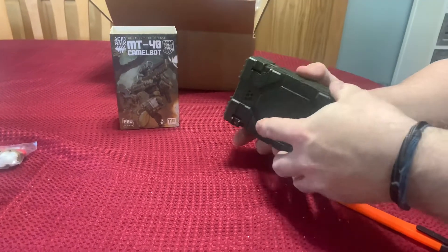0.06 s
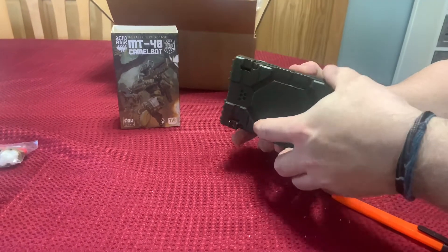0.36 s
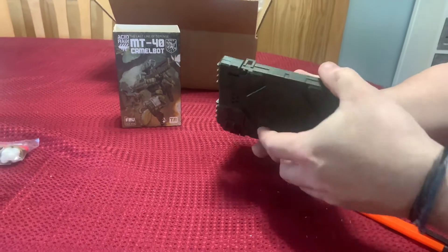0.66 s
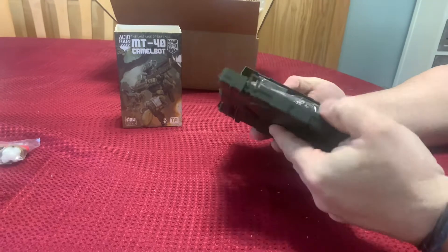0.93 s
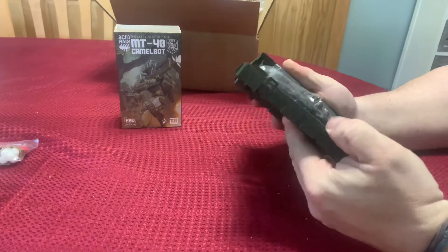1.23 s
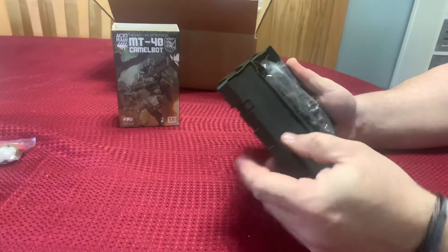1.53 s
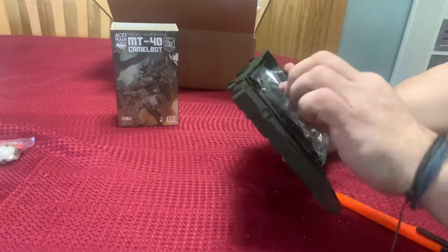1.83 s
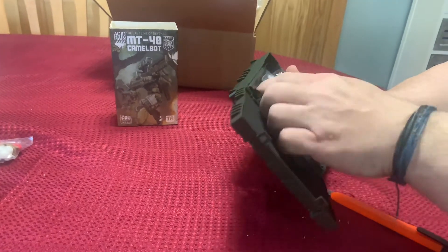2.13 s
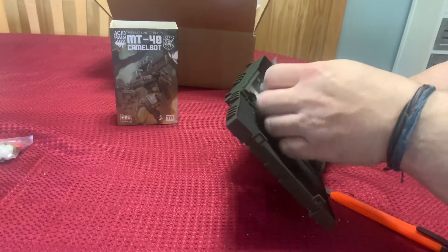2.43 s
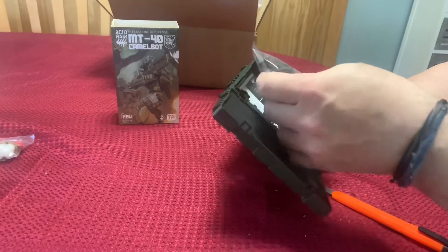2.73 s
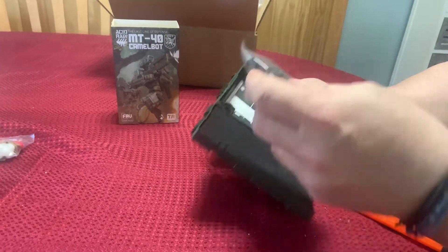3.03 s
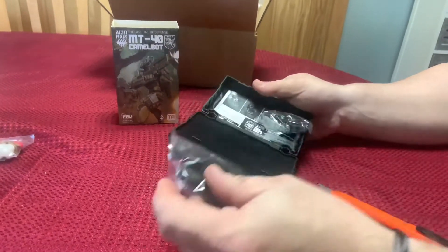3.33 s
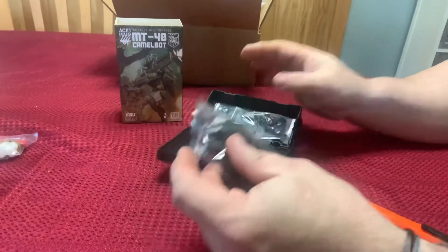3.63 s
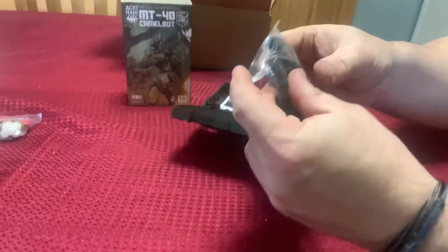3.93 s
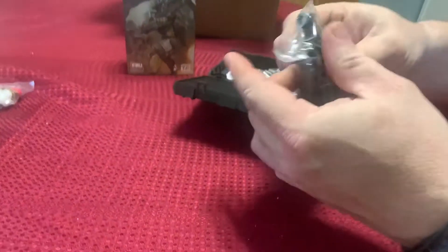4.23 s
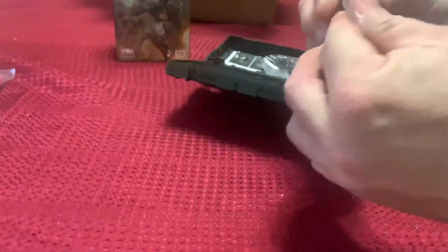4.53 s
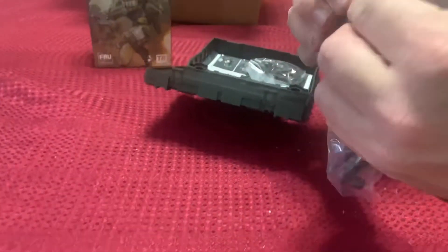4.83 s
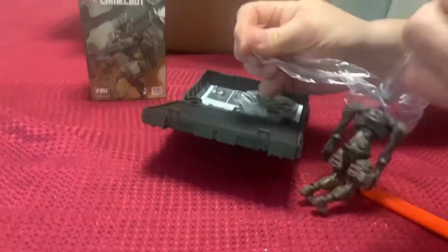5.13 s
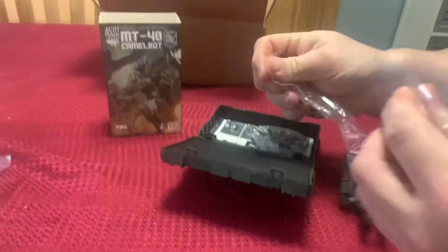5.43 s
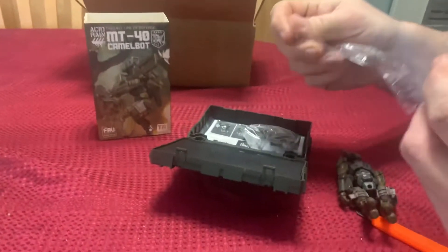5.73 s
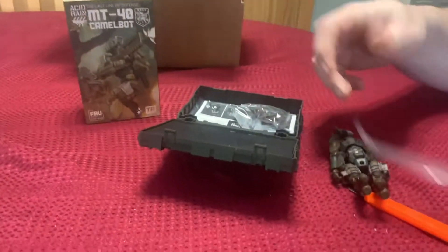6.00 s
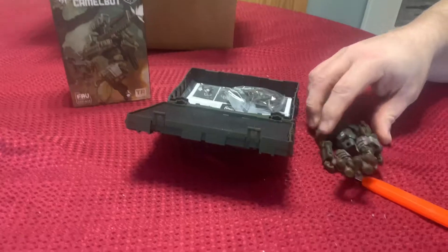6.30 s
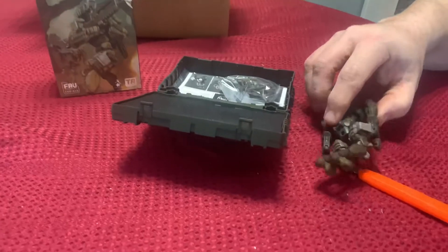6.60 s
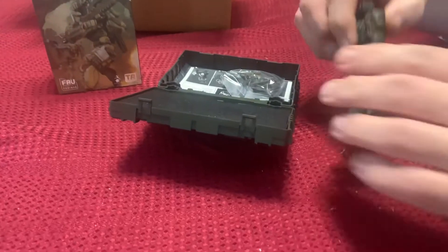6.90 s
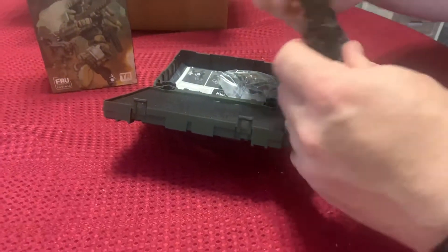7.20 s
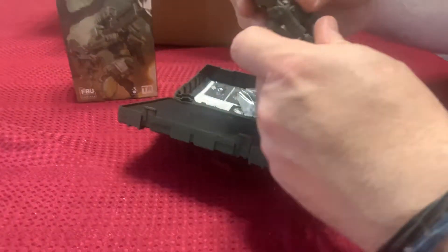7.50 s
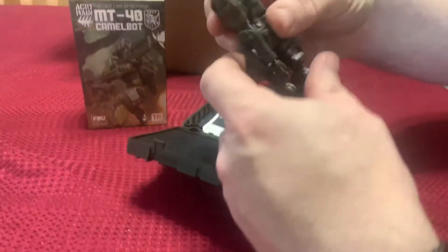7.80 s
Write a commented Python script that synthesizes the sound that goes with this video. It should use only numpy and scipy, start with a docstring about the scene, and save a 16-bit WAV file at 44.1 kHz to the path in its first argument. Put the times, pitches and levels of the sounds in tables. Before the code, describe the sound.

A small plastic click opens, followed by soft rubbing and shuffling as hands turn a hard case. A faint high whistle comes and goes around 1 to 2 seconds, with one brief creak. From about 2 seconds fingers tick and scrape inside the case, and a thin plastic bag begins to crackle. The hollow case knocks on a cloth-covered table at about 3.4 and 3.7 seconds. From 4 seconds the bag is squeezed and crinkles densely, loudest in a hard shake near 5 seconds. A small figure slides out at once, clacking and rattling, and lands with two dull pats by about 5.4 seconds. Scattered crackles and ticks thin out towards 6.7 seconds, leaving quiet rubbing and sliding over cloth until nearly 8 seconds. Everything is close, in a small room with a steady low rumble.

```python
"""A thin plastic bag crinkles as hands dig it out of a hard toy case, squeeze it and shake it.
Each crackle is a crease flipping over. The hollow case knocks on a cloth-covered table, and a small
figure slides out of the bag, clacks and lands with a pat. Fingers rub and tick on the plastic.
Two close microphones hear it all in a small room with a low rumble and, early on, a faint high whistle."""
import sys
import numpy as np
from scipy import signal
from scipy.fft import rfft, irfft, next_fast_len
from scipy.io import wavfile
from scipy.ndimage import uniform_filter1d

SR = 44100
rng = np.random.default_rng(int(sys.argv[2]) if len(sys.argv) > 2 else 0)


def master_out(mix):
    """Clip the mix to full scale and print it as 16-bit PCM to the path in sys.argv[1]."""
    frames = np.transpose(np.atleast_2d(mix))
    ceiling = np.clip(frames, -1, 1)
    pcm = np.round(ceiling * 32767).astype(np.int16)
    wavfile.write(sys.argv[1], SR, pcm)


N = 350586
HZ = np.fft.rfftfreq(2048, 1 / SR)  # the pitches at which filters are set

# tone of the case wall: pitch_hz, level_db
WALL_TONE = [(150, -2.5), (330, -1), (500, -4), (800, 2.5), (1150, 0), (1600, -1), (2550, 1), (3300, -2.5),
             (5000, -5.5), (9000, -8)]
# tone of the table's dull thud: pitch_hz, level_db
THUD_TONE = [(40, -36), (90, 7), (150, -1.5), (350, -3.5), (550, -30.5), (1200, -42.5)]


def bag():
    """Squeezing and shaking crinkle the bag, drag it over the parts inside and push puffs of air."""
    # fingers squeeze the bag: peak_s, level_db, rise_s, fall_s
    squeezes = [(2.4, -63.5, 0.4, .8), (3.1, -56, 0.15, 0.18), (3.97, -45.5, 0.25, 0.4),
                (4.09, -58, 0.06, 0.18), (4.29, -36.5, 0.21, 0.35), (4.445, -32, 0.2, 0.027),
                (4.517, -45.5, 0.066, 0.029), (4.645, -38, 0.068, 0.086), (4.87, -36.5, 0.56, 0.023),
                (5.14, -38, 0.073, 0.19), (5.42, -54, 0.23, .06), (5.67, -54, 0.16, 0.13),
                (6.04, -52.5, 0.29, 0.16)]
    # a jerk and a hard shake send the figure out: peak_s, level_db, rise_s, fall_s
    shakes = [(4.899, -28.5, 0.0044, .05), (4.95, -20, 0.0743, 0.12)]
    # the shaken bag flaps: peak_s, level_db, rise_s, fall_s
    flaps = [(4.96, -39.5, 0.076, 0.097)]
    # tones of the dragged sheet and the puff of air: pitch_hz, level_db
    sheet_tone = [(80, -26), (230, 0.5), (330, -1.5), (480, -3.5), (750, 3), (1100, -1), (1700, -3.5),
                  (2700, -1.5), (4000, 1.5), (5500, -7), (8000, -39)]
    puff_tone = [(30, -10), (70, 2), (130, 2.5), (230, -11.5), (400, 2), (550, -5.5), (1200, -19)]
    squeeze, shake = strokes(squeezes), strokes(shakes)
    # fine crackle grows faster with effort, so a light touch gives mostly single, larger creases
    fine = crinkle(squeeze ** 1.125, level_db=1.5, per_s=310, spread_db=5.5, ring_s=0.0034, focus_db=7.5)
    coarse = crinkle(squeeze ** 0.78, level_db=-19.5, per_s=31, spread_db=-0.5,
                     ring_s=0.006, focus_db=9.5)
    rush = crinkle(shake, level_db=1.0, per_s=660, spread_db=4.0)
    drag = friction((squeeze + shake) ** 1.12, sheet_tone, level_db=-9.5, grain_db=5.5, unlike=1.8)
    flap = friction(strokes(flaps), puff_tone, level_db=3.0, grain_db=2.5, unlike=0.35)
    return fine + coarse + rush + drag + flap


def crinkle(effort, level_db, per_s, spread_db, ring_s=0.0094, focus_db=8, count=24):
    """Tiny creases flip in flurries; more effort sets off more, and neighbours share a drifting pitch."""
    out = np.zeros((2, N))
    flurry, drift = [evened(uniform_filter1d(x, size=800)) for x in rng.standard_normal((2, N))]
    light_touch, flurry_db = amp(-55.5), 4
    rate = per_s * (effort / light_touch) ** 0.39 * amp(flurry_db * flurry)
    draw, scatter, chance = rng.random((3, N))
    pick = ((drift + scatter) / 2 % 1 * count).astype(int) % count
    creases = [evened(crease(hz, ring_s, focus_db)) for hz in np.geomspace(2500, 15000, count)]
    for i in np.flatnonzero(draw < rate / SR):
        size_db = spread_db * min(-np.log(chance[i]), 3.0)
        add(out, i / SR, creases[pick[i]] * amp(size_db))
    power = abs(uniform_filter1d((out ** 2).mean(0), size=3000))
    return amp(level_db) * effort * out / np.sqrt(power + .05)  # effort sets the loudness


def crease(pitch_hz, ring_s, focus_db):
    """A crease flips over and rings, along with a wide panel and a tiny facet of the film beside it."""
    # tone of the thin film: pitch_hz, level_db
    film_tone = [(100, -27), (600, -12), (1500, 1.5), (2800, 0.5), (4500, 0), (6500, 6), (8500, 10),
                 (11000, 7.5), (15500, 8.5)]
    panel_hz, facet_hz = rng.uniform([1200, 5500], [5000, 15500])
    peaks = focus_db * bump(pitch_hz, .07) + 7 * bump(panel_hz, .1) + 9 * bump(facet_hz, .04)
    return tint(burst(ring_s, unlike=1.0, size=900), read(film_tone, HZ) + peaks)


def snaps(level_db=5, gap_s=0.003, step_db=-11):
    """Creases snap in the bag and fingers make small ticks on plastic; two weaker clicks follow each."""
    # crease snaps and small finger ticks: start_s, level_db, pitch_hz
    snaps_and_ticks = [(.144, -38.5, 10500), (.479, -55, 11000), (.846, -58, 9100), (1.463, -53, 10500),
                       (1.8842, -36, 7160), (2.0291, -36, 6600), (2.074, -36.5, 6640), (2.162, -34, 6470),
                       (2.2205, -44, 4150), (2.284, -34.5, 4640), (2.363, -26, 10300), (2.4112, -30, 10600),
                       (2.419, -37, 10500), (2.4276, -26, 4100), (2.5085, -43, 4500), (2.5148, -34.5, 4500),
                       (2.539, -39, 10300), (2.61, -32, 6800), (2.636, -35.5, 10400), (2.685, -31, 9500),
                       (2.8485, -32, 9700), (2.886, -32.5, 10400), (2.955, -38.5, 6800),
                       (3.054, -36, 11200), (3.0764, -39, 10200), (3.126, -33.5, 11800),
                       (3.1502, -28, 10000), (3.365, -40, 6500), (3.426, -33.5, 6400),
                       (3.6687, -28.5, 10300), (3.691, -28, 7700), (3.774, -30, 9600), (3.8216, -30, 9600),
                       (3.8345, -27, 6900), (3.9168, -31, 10000), (3.9216, -21, 6500),
                       (3.9651, -20.5, 6860), (3.9845, -42, 7500), (4.008, -27, 10500),
                       (4.0368, -20, 10200), (4.042, -31, 3850), (4.0597, -39, 9800), (4.0716, -23, 10800),
                       (4.0865, -23, 10300), (4.093, -26, 7500), (4.1428, -27.5, 11800),
                       (4.1936, -32, 5940), (4.2328, -28, 11400), (4.2517, -20, 10800), (4.267, -33, 11500),
                       (4.2881, -21.5, 11700), (4.307, -29, 10600), (4.334, -23, 7680),
                       (4.3517, -30, 10100), (4.387, -24, 11100), (4.426, -22, 6490), (4.4417, -19, 10700),
                       (4.45, -21, 10600), (4.4767, -29, 9800), (4.502, -28, 11400), (4.5118, -19.5, 10500),
                       (4.522, -22.5, 10700), (4.546, -26.5, 10700), (4.586, -28.5, 10480),
                       (4.617, -27, 11140), (4.622, -29, 9500), (4.627, -20.5, 10400), (4.7002, -26, 11160),
                       (4.717, -25.5, 10480), (4.798, -28, 10100), (4.827, -22.5, 11500),
                       (4.8316, -23, 9700), (4.8707, -22.5, 10000), (4.881, -26, 7000),
                       (4.8971, -13.5, 10100), (4.923, -13.5, 14500), (4.9491, -7, 6900),
                       (4.976, -11.5, 7290), (5.0302, -13.5, 3970), (5.049, -25, 11000), (5.063, -27, 6040),
                       (5.223, -29.5, 6700), (5.36, -29, 6600), (5.4402, -29, 5530), (5.598, -38, 6200),
                       (5.6587, -36, 6600), (5.8459, -30.5, 3830), (5.9374, -43, 9440),
                       (5.9672, -36.5, 9800), (6, -42, 11000), (6.0524, -39, 6600), (6.0867, -37, 4350),
                       (6.111, -37, 4030), (6.158, -53, 10600), (6.188, -41.5, 3920), (6.591, -44, 12000),
                       (6.704, -48.5, 10500)]
    out = np.zeros((2, N))
    for start_s, snap_db, pitch_hz in snaps_and_ticks:
        for k in range(3):
            click = crease(pitch_hz * 2 ** (k * rng.uniform(-.3, .3)), ring_s=.005, focus_db=9)
            delay_s = k * gap_s * rng.uniform(.5, 1.1)
            add(out, start_s + delay_s, peaked(click, snap_db + level_db + k * step_db))
    return out


def case_knocks(level_db=-20, contact_s=0.00215):
    """Each knock rings the hollow case twice and thumps the table; where it lands sets the tone."""
    # knocks: start_s, level_db, pitch_hz, drop_db (per octave away from that pitch), crack_db, thud_db,
    # bounce_s, bounce_db, room_db
    knocks = [(.1437, -29, 790, 45, -42, -45.5, 0.00479, -0.5, -5),
              (2.967, -37.5, 620, 14, -52, -51, 0.019, -11.5, 1.5),
              (3.443, -16.5, 865, 9, -23, -38.5, .017, -8, 0.5),
              (3.678, -24, 1000, 11.5, -38, -44.5, 0.018, -13, -1.5)]
    # the notes the case rings at: pitch_hz, level_db, ring_s
    case_notes = [(139, -13, .1), (233, -6, 0.055), (353, -3.5, 0.079), (510, -4, 0.036), (671, -6, 0.042),
                  (744, 1, 0.025), (831, -1, 0.027), (915, 8, 0.013), (960, -2, 0.024), (1030, -18, 0.034),
                  (1110, -8, 0.031), (1178, -2, 0.039), (1380, 4, 0.02), (1630, -6, 0.024),
                  (1646, -4, 0.027)]
    # tone of the crack where it hits: pitch_hz, level_db
    crack_tone = [(200, -13), (900, 7), (1700, 8.5), (3300, 2.5), (3900, -19.5), (12000, -29)]
    out, t = np.zeros((2, N)), np.arange(SR // 8) / SR
    note_hz, note_db, ring_s = np.transpose(case_notes)[:, :, None]
    for start_s, knock_db, pitch_hz, drop_db, crack_db, thud_db, bounce_s, bounce_db, room_db in knocks:
        hit = np.zeros((2, SR // 2))
        weight_db = note_db - drop_db * abs(np.log2(note_hz / pitch_hz))
        for delay_s, blow_db in [(0, 0), (bounce_s, bounce_db)]:
            ring = ringing(t, note_hz, weight_db, ring_s, unlike=0.34)
            ring *= 1 - np.exp(-(t / contact_s) ** 4)  # the cloth cushions the blow
            add(hit, delay_s, amp(knock_db + level_db + blow_db) * evened(ring))
        crack = tint(burst(ring_s=0.01, unlike=0.57), read(crack_tone, HZ))
        thud = tint(burst(ring_s=0.35, unlike=0.1, size=5000), read(THUD_TONE, HZ))
        add(hit, contact_s, peaked(crack, crack_db))
        add(hit, contact_s, peaked(thud, thud_db))
        add(out, start_s, room(hit, near_db=room_db - 6, tail_db=room_db - 8))
    return out


def figure_clinks(bounce_s=.008, bounce_db=-9, right_db=2.5):
    """The figure's limbs hit each other with a click, ring briefly and bounce once."""
    # limbs hit: start_s, level_db, pitch_hz, click_db
    clinks = [(5.11, -26, 4200, -3), (5.1161, -14, 4340, -0.5), (5.1238, -21, 3960, 5),
              (5.17, -34, 3900, -8), (5.3444, -28.5, 4100, -3.5), (5.372, -38, 4050, -20),
              (5.393, -34, 4000, -20), (5.408, -29, 4100, 0), (5.424, -32, 4100, -10), (5.44, -26, 4100, 5),
              (6.047, -39, 4190, -2), (6.148, -39.5, 3760, -6), (6.346, -39.5, 3870, -16),
              (6.538, -38, 4040, -22), (6.59, -32.5, 4090, -14)]
    # tone of the click: pitch_hz, level_db
    click_tone = [(200, -13), (1400, -18), (2600, -2), (4200, -9), (6500, 1), (9000, -13.5), (15500, -7)]
    out = np.zeros((2, N))
    for start_s, level_db, pitch_hz, click_db in clinks:
        for k in range(2):
            ring = figure_ring(pitch_hz)
            click = tint(burst(ring_s=0.031, unlike=0.8, size=ring.shape[1]), read(click_tone, HZ))
            clink = peaked(ring, 0) + peaked(click, click_db + 7)
            delay_s = k * bounce_s * rng.uniform(0.91, 1.5)
            add(out, start_s + delay_s, peaked(clink, level_db + k * bounce_db))
    return out * amp([[-right_db / 2], [right_db / 2]])


def figure_ring(pitch_hz, contact_s=0.0019):
    """One touch sets the hard little figure ringing."""
    # its notes: pitch_ratio, level_db, ring_s
    figure_notes = [(.71, -15, 0.021), (.815, -12, 0.017), (.93, -10, .026), (1.001, -6, 0.036),
                    (1.07, -7, .02), (1.23, -11.5, .02), (1.3, -13.5, 0.02), (1.62, -20, .02)]
    t = np.arange(3000) / SR
    ratio, level_db, ring_s = np.transpose(figure_notes)[:, :, None]
    return ringing(t, pitch_hz * ratio, level_db, ring_s, unlike=0.72) * (1 - np.exp(-t / contact_s))


def figure_rattle(level_db=-7, pitch_hz=4020, per_s=260):
    """The sliding figure scrapes, and many tiny touches keep its loose joints ringing."""
    # it slides against the bag's mouth: peak_s, level_db, rise_s, fall_s
    slides = [(5.165, -44, 0.082, 0.081), (5.365, -54, 0.035, 0.11), (5.435, -49, 0.12, 0.048)]
    # tone of the scrape: pitch_hz, level_db
    slide_tone = [(1000, -11), (2900, 0.5), (3500, -2.5), (4050, 8.5), (4600, -5), (7200, -0.5),
                  (8500, -15), (15000, -13)]
    rings, effort = np.zeros((2, N)), strokes(slides)
    moving = effort > effort.max() / 30
    for i in np.flatnonzero((rng.random(N) < per_s / SR) & moving):
        add(rings, i / SR, figure_ring(pitch_hz * rng.uniform(.965, 1.035)))
    scrape = friction(effort, slide_tone, level_db=3, grain_db=5.5, unlike=0.93)
    return amp(level_db) * effort * rings / rings[:, moving].std() + scrape


def figure_landings():
    """The light figure drops on the cloth and topples, each time with a dull pat."""
    # landings: start_s, level_db
    landings = [(5.1863, -27), (5.324, -32.5)]
    # tone of the pat: pitch_hz, level_db
    pat_tone = [(40, -7), (80, 0), (140, 1), (220, -7), (420, -4.5), (700, -3.5), (1050, -2.5), (1450, -7),
                (1800, -13), (2500, -22), (5000, -51)]
    out = np.zeros((2, N))
    for start_s, level_db in landings:
        pat = tint(burst(ring_s=0.078, unlike=0.61, size=4000), read(pat_tone, HZ))
        add(out, start_s, peaked(pat, level_db))
    return out


def ticks():
    """Bagged parts and fingernails tick against hard plastic."""
    # taps: start_s, level_db, pitch_hz, boost_db (at that pitch)
    taps = [(0.1427, -35, 2590, 13), (1.8743, -40, 2510, 1), (1.886, -37, 2600, 22),
            (1.9982, -40.5, 2030, 5), (2.0385, -33, 1110, 3), (2.1922, -45, 5180, 11),
            (2.2195, -34.5, 900, 11.5), (2.2854, -40, 1170, 10), (2.3331, -31, 2230, 11),
            (2.349, -51, 2300, 12), (2.3626, -29, 1500, -6), (2.4268, -36, 1530, 21),
            (2.4884, -44, 1650, 8), (2.5575, -25, 2460, 16.5), (2.6852, -37.5, 2260, 16),
            (2.744, -36.5, 1190, 3), (2.886, -40.5, 2640, 18), (2.9186, -43, 930, 4),
            (3.039, -45, 1480, 12), (5.6151, -40, 2520, 15), (5.6415, -36.5, 4130, 11),
            (5.782, -41.5, 2630, 9.5), (5.845, -36.5, 3740, 17), (5.866, -42, 2700, 8), (6.0, -39, 3000, 8),
            (6.188, -41.5, 3600, 5)]
    out = np.zeros((2, N))
    for start_s, level_db, pitch_hz, boost_db in taps:
        tone_db = read(WALL_TONE, HZ) + boost_db * bump(pitch_hz, octaves=0.43)
        tick = tint(burst(ring_s=0.02, unlike=1.0), tone_db)
        add(out, start_s, peaked(tick, level_db))
    return out


def fingers():
    """Fingers catch and slip on the case, so it scrapes, hisses and creaks."""
    # finger moves: peak_s, level_db, rise_s, fall_s
    digs = [(1.9, -55.5, 0.092, 0.1), (2.046, -54, 0.066, 0.052), (2.29, -55.5, 0.24, 0.15),
            (2.35, -72.5, 0.056, .09), (2.428, -44.5, 0.032, 0.014), (2.565, -52, 0.11, 0.16),
            (2.87, -64, 0.14, 0.65), (3.41, -62, 0.45, 0.3)]  # digging the bag out along the wall
    rubs = [(.712, -70, 0.083, 0.062), (1.27, -80, .25, .15), (3.43, -67.5, 0.15, 0.24),
            (5.664, -67, 0.15, 0.15), (6.55, -73, 0.091, 0.13), (6.9, -84, .1, .15),
            (7.17, -75.5, 0.23, 0.18), (7.78, -77, .02, 0.056)]  # skin slides over plastic
    skids = [(1.411, -49.5, 0.046, 0.017)]  # a thumb makes the edge creak
    # tones of the rub and the creak: pitch_hz, level_db
    skin_tone = [(200, -24), (1000, -4.5), (2600, 0.5), (4500, 4), (5500, -6), (6900, 8.5), (9000, -8),
                 (12000, -1), (15500, -4)]
    edge_tone = [(800, -7), (2250, -1), (2600, 9), (3000, -4), (4000, 2), (5400, -4), (6000, 6), (6450, -9),
                 (6950, 6), (7600, -6), (11000, -6), (15500, -9)]
    dig = friction(strokes(digs), WALL_TONE, level_db=5.5, grain_db=7.5, unlike=1.9)
    rub = friction(strokes(rubs), skin_tone, level_db=13.0, grain_db=4.5, unlike=0.41)
    skid = friction(strokes(skids), edge_tone, level_db=3.5, grain_db=2.0, unlike=2.8)
    return dig + rub + skid


def shuffling():
    """Things slide over the table and the hollow case with a dull rustle."""
    # sliding moves: peak_s, level_db, rise_s, fall_s
    shifts = [(.12, -58, .08, .15), (.9, -55.5, 0.12, .12), (1.07, -59, .1, .14), (1.55, -62, 0.62, 0.4),
              (2.55, -58.5, .15, 0.26), (3.0, -59, 0.078, 0.13), (3.27, -50.5, .12, 0.35),
              (3.71, -46.5, 0.092, 0.11), (6.4, -60.5, 0.34, 0.24), (6.92, -57.5, 0.13, .3),
              (7.08, -58.5, .1, 0.17), (7.24, -66, 0.12, 0.25), (7.62, -65, 0.14, 0.28)]  # case and forearms shift on the table
    brushes = [(.12, -57.5, 0.039, 0.05), (.21, -65, 0.044, 0.087), (.49, -69, .05, .1),
               (.675, -62, 0.13, 0.072), (1.06, -69.5, 0.12, .12), (1.3, -71, 0.22, .2),
               (3.0, -67, .05, 0.067), (3.37, -62, 0.11, 0.054), (3.85, -59.5, 0.063, .15)]  # palms brush the case
    drags = [(.63, -62, .08, .1), (1.15, -65, .2, 0.46), (1.65, -69.5, 0.16, .15), (2.4, -61, 0.22, 0.13),
             (3.25, -61, 0.09, 0.3), (5.85, -64, 0.11, 0.11), (5.99, -58, 0.096, 0.26),
             (6.3, -58, 0.1, 0.095), (6.55, -66, .05, .1), (6.8, -66, .08, .18), (7.3, -69, .2, 0.22),
             (7.62, -68, .08, .15)]  # hands and figure drag over the cloth
    # tones of the brushed case and the cloth: pitch_hz, level_db
    hollow_tone = [(150, -5), (350, -10), (550, -8), (760, 2), (1150, -3.5), (1600, -13), (4000, -21)]
    cloth_tone = [(80, -4), (230, 3), (340, 4), (520, -12), (1050, -6.5), (1700, -11), (5000, -30)]
    shift = friction(strokes(shifts), THUD_TONE, level_db=-2.5, grain_db=7.0, unlike=0.49)
    brush = friction(strokes(brushes), hollow_tone, level_db=0.5, grain_db=1.5, unlike=0.6)
    drag = friction(strokes(drags), cloth_tone, level_db=-1, grain_db=6, unlike=0.27)
    return shift + brush + drag


def whistle():
    """A faint, thin, high whistle comes and goes."""
    # swells: peak_s, level_db, rise_s, fall_s
    swells = [(.87, -68, 0.098, 0.1), (1.09, -73, 0.24, 0.56), (1.64, -72, 0.3, 0.15)]
    # its narrow tone: pitch_hz, level_db
    whistle_tone = [(3000, -40), (4200, -22), (4420, -11), (4680, -24), (6500, -43)]
    return friction(strokes(swells), whistle_tone, level_db=1.5, grain_db=2.0, unlike=0.94)


def room(x, near_db, tail_db, count=9):
    """Adds a few echoes from nearby things, then a soft tail whose treble dies first."""
    # time the room takes to fade by 60 dB: pitch_hz, fade_s
    fade_times = [(150, 0.6), (500, 0.25), (1300, 0.28), (2400, 0.22), (4200, 0.21), (9000, 0.15),
                  (15000, 0.06)]
    early = np.zeros((2, SR // 2))
    for side in early:
        delay_s = rng.uniform(.001, .014, count)
        side[(delay_s * SR).astype(int)] = rng.choice([-1, 1], count) * np.exp(-delay_s / 0.011)
    hz, t, noise = signal.stft(rng.standard_normal(early.shape), SR, nperseg=256)
    fade = amp(-60 * t / read(fade_times, hz)[:, None])
    tail = signal.istft(noise * fade, SR)[1][:, :SR // 2]
    tail *= np.clip(np.arange(SR // 2) / SR / 0.0016, 0, 1) ** 2
    echo = sum(amp(db) * part / np.linalg.norm(part, axis=1, keepdims=True)
               for db, part in [(near_db, early), (tail_db, tail)])
    return x + signal.oaconvolve(x, echo, axes=1)[:, :x.shape[1]]


def room_rumble(level_db=-52.5):
    """A steady low rumble with a faint hiss."""
    # tone of the quiet room: pitch_hz, level_db
    rumble_tone = [(20, -24), (38, -17.5), (47, -10), (55, 4.5), (66, -4), (120, -9), (180, -15.5),
                   (290, -16), (420, -22), (600, -25), (1500, -30.5), (4500, -33), (7000, -37.5),
                   (9000, -50), (15500, -48.5)]
    size = next_fast_len(N, True)
    gain = amp(read(rumble_tone, np.fft.rfftfreq(size, 1 / SR)))
    spectrum = rfft(rng.standard_normal((2, size))) * gain
    return amp(level_db) * evened(irfft(spectrum, size)[:, :N])


def microphones(x, lag):
    """Two close microphones; the left hears the sound lag samples late."""
    # left-right difference, small in the bass and high treble: pitch_hz, gain_db
    width = [(60, -12.5), (125, -9), (300, -8.5), (700, 0.5), (1500, -2.5), (6000, 3.5), (8500, -9.5),
             (16000, -11)]
    mid = (x[0] + x[1]) / 2
    side = tint((x[:1] - x[1:]) / 2, read(width, HZ))[0]
    return np.array([np.roll(mid + side, lag), mid - side])


def strokes(moves):
    """Effort over time: each move swells by 20 dB in rise_s and drops by 20 dB in fall_s."""
    t = np.arange(0, N, 32) / SR
    power = sum(amp(level_db - 20 * np.maximum((peak_s - t) / rise_s, (t - peak_s) / fall_s)) ** 2
                for peak_s, level_db, rise_s, fall_s in moves)
    return np.interp(np.arange(N) / SR, t, np.sqrt(power))


def friction(effort, tone, level_db, grain_db, unlike):
    """A grainy hiss, as of catching and slipping; unlike sets how much left and right differ."""
    noise = rng.standard_normal((4, N))
    slips = amp(grain_db * np.minimum(evened(uniform_filter1d(noise[3], size=260)), 1.3))
    hiss = tint((noise[2] + unlike * noise[:2]) * slips, read(tone, HZ))
    return amp(level_db) * effort * evened(hiss)


def ringing(t, pitch_hz, level_db, ring_s, unlike):
    """The notes of a struck object, each fading by 60 dB in its ring_s."""
    phase = 2 * np.pi * rng.random(pitch_hz.shape) + unlike * rng.standard_normal((2, *pitch_hz.shape))
    return (amp(level_db - 60 * t / ring_s) * np.sin(2 * np.pi * pitch_hz * t + phase)).sum(1)


def burst(ring_s, unlike, rise_s=.00028, size=1500):
    """A short shiver of noise that fades by 60 dB in ring_s."""
    t = np.arange(size) / SR
    noise = rng.standard_normal((3, size))
    return (noise[0] + unlike * noise[1:]) * (1 - np.exp(-t / rise_s)) * amp(-60 * t / ring_s)


def tint(x, db):
    """Filters a sound with the given gain at each pitch in HZ."""
    log_gain = np.log(amp(np.maximum(np.r_[db, db[-2:0:-1]], -100)))
    response = np.exp(np.conj(signal.hilbert(log_gain)))  # rings after a hit, never before
    taps = np.fft.ifft(response).real[:len(HZ)]
    return signal.oaconvolve(x, taps[None], axes=1)[:, :x.shape[1]]


def bump(pitch_hz, octaves):
    """A peak of height one around a pitch."""
    return 1 / (1 + (np.log2((HZ + 1) / pitch_hz) / octaves) ** 2)


def read(points, hz):
    """Reads between a table's rows, with pitch spaced in octaves."""
    pitch_hz, value = np.transpose(points)
    return np.interp(np.log(hz + 1), np.log(pitch_hz + 1), value)


def amp(db):
    """Decibels to gain."""
    return 10 ** (np.asarray(db) / 20)


def evened(x):
    """Scales to an average power of one."""
    return x / np.sqrt(np.mean(x ** 2) + 1e-20)


def peaked(x, db):
    """Scales to a peak level."""
    return amp(db) * x / abs(x).max(1).mean()


def add(mix, start_s, sound):
    """Mixes in a two-channel sound at start_s."""
    part = mix[:, max(round(start_s * SR), 0):][:, :sound.shape[1]]
    part += sound[:, :part.shape[1]]


def scene():
    """Bag and hands to the right, the figure further right, knocks and pats a little left."""
    close = room(bag() + ticks() + fingers() + whistle() + shuffling(), near_db=-9.5, tail_db=-8.0)
    close += room(snaps(), near_db=-10, tail_db=-8.5)
    figure = room(figure_clinks() + figure_rattle(), near_db=-11.5, tail_db=-11)
    table = case_knocks() + room(figure_landings(), near_db=-5.5, tail_db=-5.5)
    return (microphones(close + room_rumble(), lag=8) + microphones(figure, lag=12)
            + microphones(table, lag=-4))


def record(dry):
    """Cuts the highest treble, above 15950 Hz."""
    low_pass = signal.firwin(401, 15950, window=("kaiser", 8), fs=SR)
    return signal.oaconvolve(dry, low_pass[None], "same")


dry = scene()
out = record(dry)
master_out(out)
```